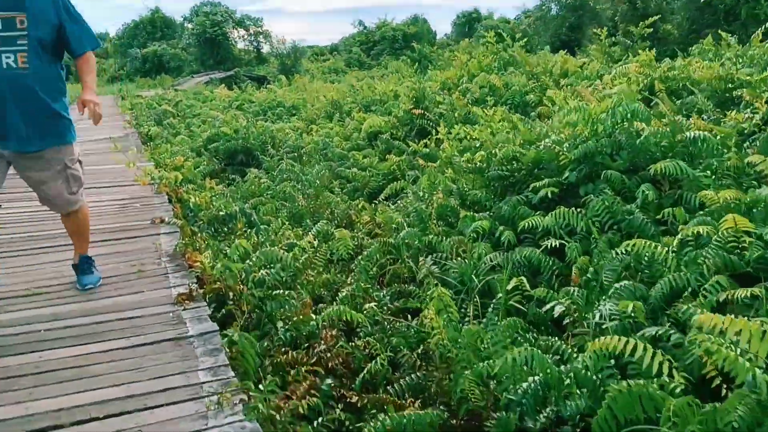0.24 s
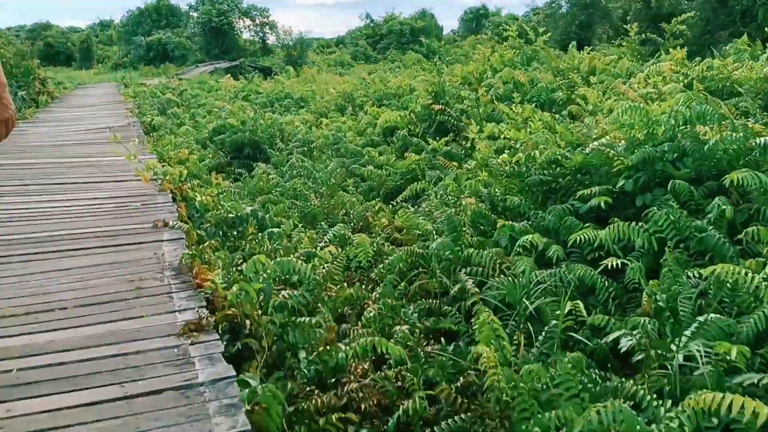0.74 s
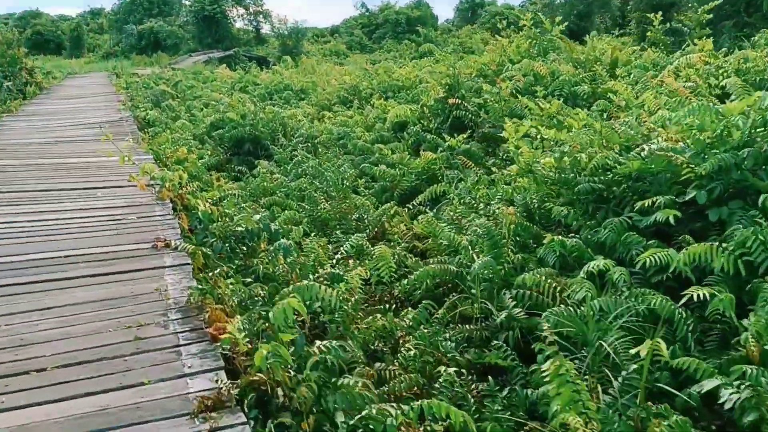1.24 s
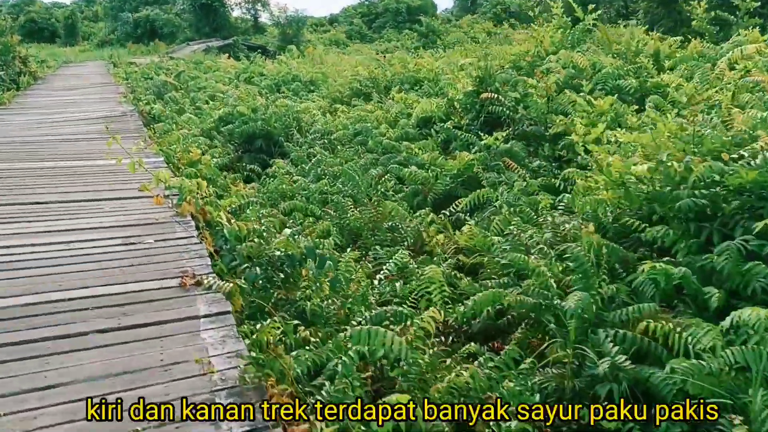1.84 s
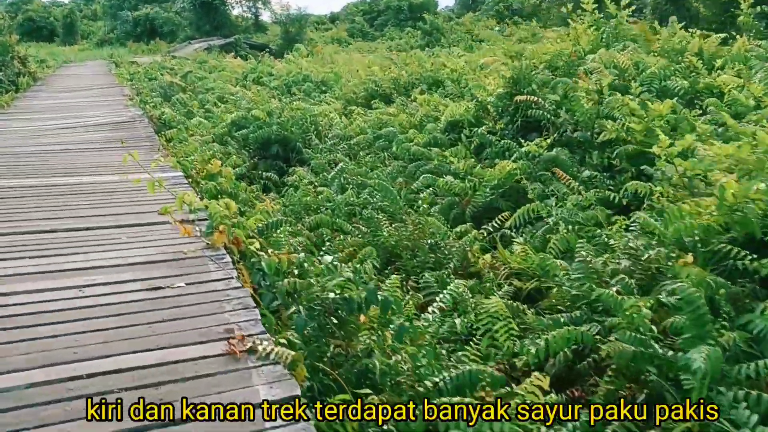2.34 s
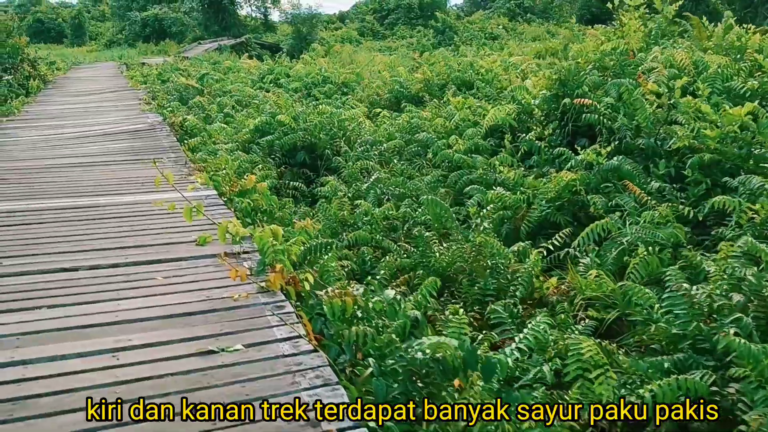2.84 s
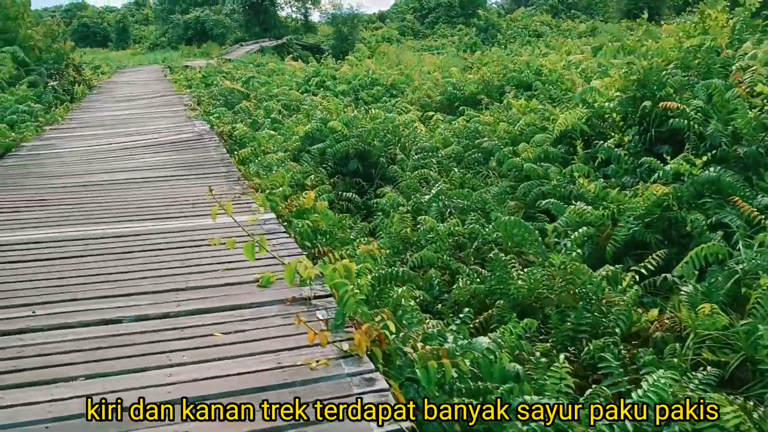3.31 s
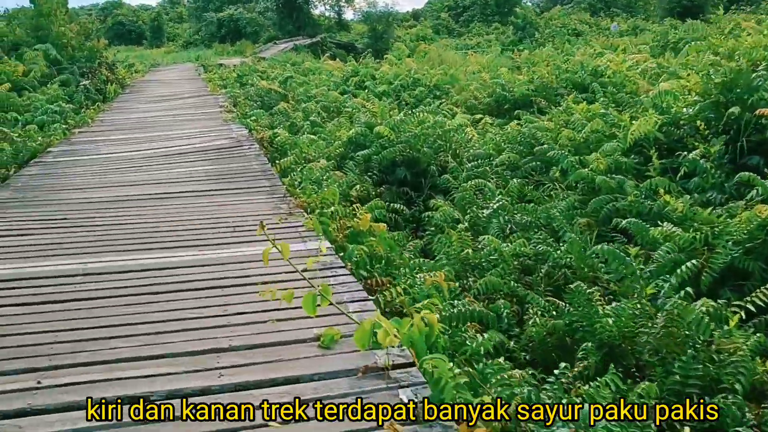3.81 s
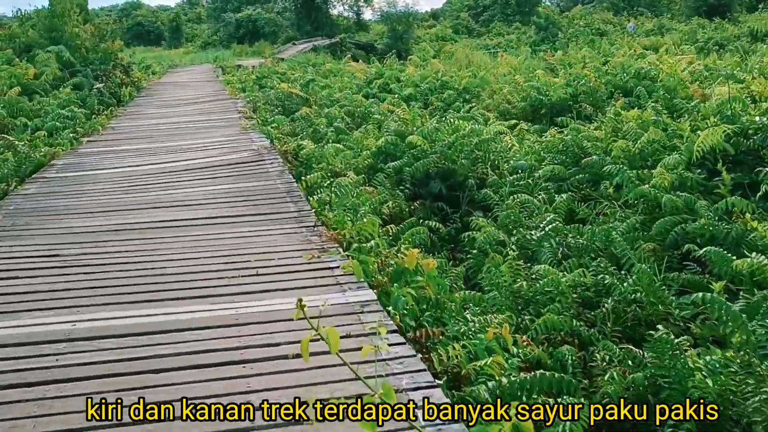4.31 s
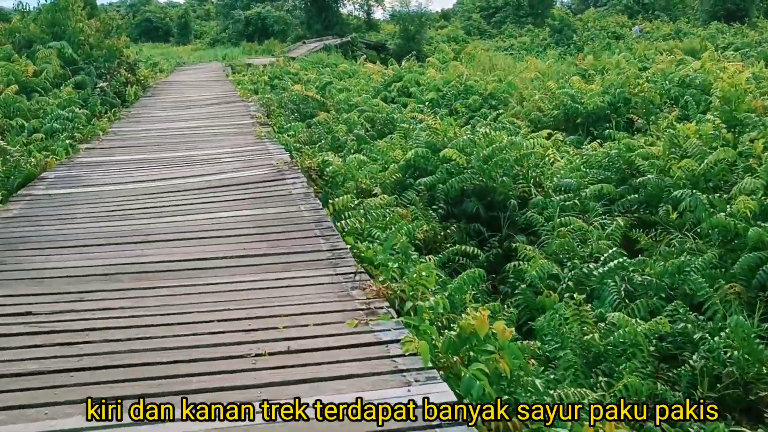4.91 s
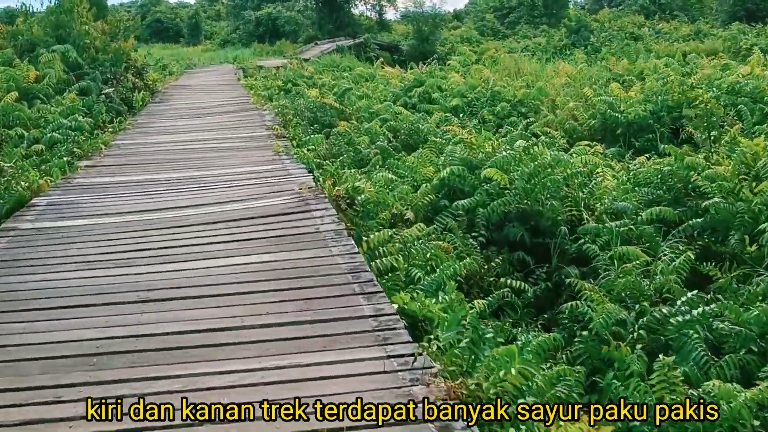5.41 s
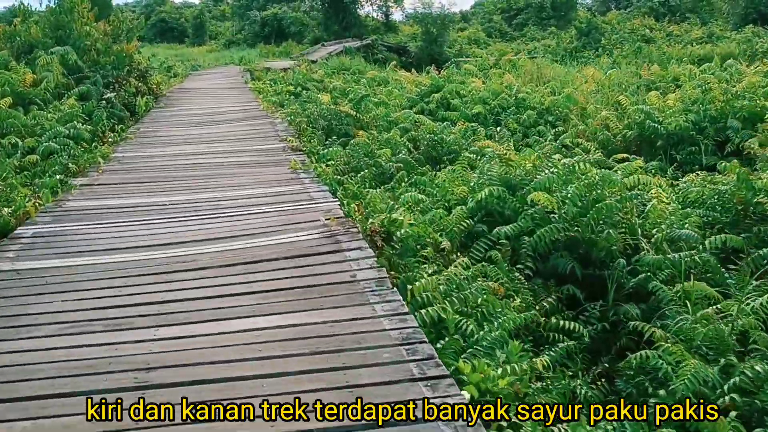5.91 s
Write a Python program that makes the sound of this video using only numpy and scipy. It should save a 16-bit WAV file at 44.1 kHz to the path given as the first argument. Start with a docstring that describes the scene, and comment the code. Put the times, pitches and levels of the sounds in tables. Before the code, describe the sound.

Close, brisk footsteps in rubber soles on a boardwalk of loose planks: hollow woody knocks about every half second, each with small clatters, board creaks and gritty scuffs. The first half second is quiet, then the steps grow firm. Faint insects hiss behind, one soft bird whistle falls near one second, and a very high thin whine wavers on the right. Open, dry outdoor place; stereo microphone near the deck, with slight low rumble.

```python
"""Brisk footsteps on a boardwalk of loose planks, with insects, one bird whistle and a thin, high whine on the right.
Each blow is a burst of bounces ringing plank resonances, plus the struck plank's own decaying note.
Beams thump as damped sines; short bright bursts, creaks and brushes are noise through resonances;
rubbing soles, stirring boards and a low rumble are fluttering noise bands. Insects are narrow noise,
steady or pulsed; bird and whine are wavering sines."""
import sys
import numpy as np
from scipy import signal
from scipy.io import wavfile

SR = 44100
rng = np.random.default_rng(int(sys.argv[2]) if len(sys.argv) > 2 else 0)


def waveform_to_disk(signal):
    """Save audio, clipped to [-1, 1], as 16-bit WAV at the path in sys.argv[1]."""
    frames = np.transpose(np.atleast_2d(signal))
    scaled = np.clip(frames, -1, 1) * 32767
    samples = np.round(scaled).astype(np.int16)
    wavfile.write(sys.argv[1], SR, samples)


N = 271523
TIME_S = np.arange(N) / SR

# Heels, toes and loose boards striking the deck. Each row: start in seconds, relative level in dB,
# hardness as tilt in dB per octave, relative clatter decay in seconds, lead of the left channel in ms,
# the plank's own note in Hz.
KNOCKS = [(0.021, -39.5, -4, 0.057, -0.21, 331), (.44, -37.5, 2, 0.046, 0.24, 325),
          (.484, -33, -3, 0.069, 0.28, 192.4), (.516, -33, -0.5, 0.021, 0.29, 305),
          (.562, -32, 3, 0.22, 0.33, 436), (.691, -27, 1, 0.21, 0.26, 481),
          (.956, -29, 1.5, 0.56, 0.31, 438), (0.9961, -20, 2, 0.091, -0.086, 277.2),
          (1.015, -19, -0.5, 0.08, 0.096, 482), (1.422, -32, -2.5, 0.028, .2, 316),
          (1.48, -17, 2.5, 0.25, 0.26, 318.4), (1.538, -32, 2.5, 0.11, 0.27, 313),
          (1.568, -26, -1, 0.2, 0.17, 291), (1.65, -29.5, -1, .07, 0.33, 320),
          (1.681, -33, -1.5, 0.11, 0.22, 615), (1.762, -31.5, 1.5, 0.23, -0.22, 503),
          (2.0562, -14.5, 1, 0.088, -0.035, 307), (2.1116, -21, 1, 0.091, 0.11, 212),
          (2.485, -45, -5, 0.065, 0.26, 475), (2.6, -21.5, 0, 0.047, 0.12, 277.2),
          (2.799, -33, -3, 0.31, -0.32, 407), (2.978, -37.5, 0.5, 0.72, 0.15, 794),
          (3.103, -22.5, -1.5, 0.11, 0.034, 345.5), (3.1479, -23, 2, 0.052, -0.11, 600),
          (3.156, -18, 4.5, 0.12, 0.11, 314), (3.216, -34, 1.5, 0.034, 0.18, 715),
          (3.33, -39.5, -1.5, 0.18, 0.097, 372), (3.498, -33.5, -2, 0.13, 0.15, 417),
          (3.626, -36, -6.5, 0.02, 0.24, 350), (3.714, -25, 3.5, 0.18, -0.23, 460),
          (4.1245, -21, -2, 0.38, 0.34, 281.6), (4.162, -15.5, 2.5, 0.15, 0.24, 569),
          (4.2, -25.5, 2.5, 0.22, 0.22, 235), (4.356, -42.5, 1, 0.18, -0.065, 754),
          (4.422, -47, 3, 0.13, 0.11, 1250), (4.894, -32.5, 1, 0.22, -0.12, 394),
          (4.931, -30, 1.5, 0.33, -0.21, 533), (4.98, -37.5, -1, 0.11, -0.34, 350),
          (5.2288, -21.5, -3.5, 0.045, 0.33, 635), (5.237, -20, -5, 0.091, 0.14, 560),
          (5.293, -29, -5, 0.22, -0.059, 223), (5.303, -31, 4, 0.34, 0.28, 320),
          (5.46, -41.5, 5, 0.13, 0.14, 390), (5.634, -37.5, -5, 0.24, 0.23, 342),
          (5.7177, -19, 0.6, 0.079, 0.25, 279.5), (5.788, -37, -2, 0.096, 0.32, 280),
          (5.933, -33.5, 4, 0.12, -0.098, 696), (5.942, -26, 3, 0.27, -0.028, 424)]
# Thud, knock, clack and crack of the wood. Each row: low edge in Hz, high edge in Hz.
REGISTERS_HZ = [(70, 250), (250, 700), (700, 1800), (1800, 4500)]
# Weight of thud, knock, clack and crack in an untilted blow, in dB.
REGISTER_DB = (-12.5, -2, -2.5, -11)
# Plank resonances. Each row: nominal frequency in Hz, width in Hz, relative gain in dB.
PLANK = [(155.2, 49, 2), (224, 67, 5.5), (303, 99, 4.5), (428.4, 146, 2.5), (577.4, 41, 0), (780, 57, -2),
         (1007, 160, -7.5), (1340, 140, -7), (1664, 83, -3.5), (2024, 180, 1), (2329, 140, 2.5),
         (2736, 43, 1.5)]
# Beams giving under the walker's weight. Each row: start in seconds, relative level in dB.
THUMPS = [(0.989, -43), (2.733, -40), (2.782, -41), (4.163, -28)]
# Short bright bursts: grit and twigs snapping, and two faint high chirps near 10 kHz.
# Each row: start in seconds, relative level in dB, pitch in Hz.
BRIGHT_BURSTS = [(0.447, -50, 3320), (0.955, -47, 4600), (1.293, -50.5, 10160), (1.422, -49.5, 9960),
                 (1.438, -34.5, 3290), (2.595, -42, 5250), (2.942, -49, 5000), (3.565, -45.5, 5100),
                 (3.715, -47.5, 4950), (5.261, -46.5, 5260), (5.268, -42, 11000), (5.734, -37, 4650),
                 (5.734, -41, 8700), (6.008, -36.5, 4400)]
# Boards creaking, groaning or clacking, some at the moment of a blow.
# Each row: start in seconds, level in dB, pitch in Hz, width in Hz.
CREAKS = [(1.462, -54, 3030, 208), (2.348, -61.5, 2430, 378), (2.482, -52.5, 1305, 55.8),
          (3.699, -44.5, 3000, 800), (4.66, -58, 2800, 110), (4.758, -51.5, 1050, 300),
          (5.228, -25.5, 667, 135), (5.41, -50.5, 1350, 59), (5.633, -43, 884, 110),
          (5.721, -32.5, 2770, 173)]
# Light soles brushing a board. Each row: start in seconds, length in seconds, relative level in dB,
# start resonance in Hz, end resonance in Hz.
BRUSHES = [(0.074, 0.054, -47.5, 615, 524), (0.158, 0.067, -48.5, 611, 737),
           (0.251, 0.066, -50.5, 848, 717), (3.471, 0.04, -36.5, 896, 424), (4.492, .1, -49, 705, 508),
           (4.682, 0.12, -37, 197, 346)]
# Soles rolling over the boards. Each row: time of full weight in seconds, hold in seconds,
# stirring boards in dB, rubbing sole in dB.
ROLLS = [(0.0, 0.031, -35.5, -49), (0.478, 0.12, -37.5, -46.5), (1.004, 0.27, -47, -52.5),
         (1.441, 0.0062, -39, -36.5), (1.53, 0.27, -41.5, -50), (2.012, 0.06, -52.5, -54.5),
         (2.288, 0.017, -75, -62.5), (2.615, 0.028, -32, -63), (3.701, 0.044, -37, -51),
         (4.029, 0.011, -42, -91), (4.933, 0.045, -33.5, -50), (5.066, 0.02, -52, -53.5),
         (5.252, .008, -34, -39.5), (5.456, .03, -40, -56), (5.684, 0.13, -50, -55),
         (5.966, 0.0062, -35.5, -34.5)]
# Spectrum of the stirring boards. Each row: frequency in Hz, relative density in dB per Hz.
BOARDS_SPECTRUM = [(120, -10.5), (280, 2.5), (600, -5.5), (1000, -0.5), (2200, -14), (3500, -16.5),
                   (6000, -39.5)]
# Spectrum of the rubbing soles and the air. Each row: frequency in Hz, relative density in dB per Hz.
SCUFF_SPECTRUM = [(1200, 0), (3200, -5), (5500, -9), (7000, -18), (11000, -41)]
# Spectrum of the low rumble. Each row: frequency in Hz, relative density in dB per Hz.
RUMBLE_SPECTRUM = [(25, -32), (50, 2), (85, 13.5), (150, -0.5), (250, -5.5), (500, -67)]
# Course of the low rumble. Each row: time in seconds, relative level in dB.
RUMBLE_LEVEL = [(0.0, -52.5), (0.35, -84.5), (0.52, -60.5), (1.3, -57), (1.86, -48.5), (1.98, -70),
                (2.45, -57.5), (2.81, -39.5), (3.0, -66.5), (3.4, -70.5), (3.6, -42.5), (3.9, -69),
                (4.2, -54), (4.32, -77), (5.25, -64.5), (5.57, -88)]
# Bird whistle. Each row: time in seconds, mean pitch in Hz, amplitude in dB.
BIRD = [(1.01, 3280, -66), (1.04, 3250, -52), (1.12, 3200, -51), (1.18, 3060, -56), (1.28, 3020, -74)]
# The two whine tones, in Hz.
WHINE_HZ = (15031, 15087)
# Each whine tone against the common course, in dB.
WHINE_LINE_DB = (0, 8.5)
# Common course of the whine tones. Each row: time in seconds, relative level in dB.
WHINE_LEVEL = [(0.0, -48), (0.38, -70), (0.5, -40.5), (0.84, -68.5), (1.01, -45.5), (1.6, -50), (2.4, -41),
               (2.88, -58), (3.15, -44), (3.55, -59), (3.64, -35), (3.94, -54.5), (4.06, -41),
               (4.53, -51.5), (4.61, -38.5), (5.5, -59), (5.74, -32), (6.16, -59)]
# Likeness of the two channels. Each row: frequency in Hz, correlation (no unit).
LIKENESS = [(40, .1), (120, .95), (300, .96), (600, .8), (1200, .45), (2500, .25)]

TILT_PIVOT_HZ = 600
SOFT_DB, HARD_DB = -41, -31  # strongest register of a fully soft and a fully hard blow
LEAD_MAX_MS = 0.4
ROLL_ATTACK_S, ROLL_RELEASE_T60_S = 0.051, 0.26
GRIT_DB, GRIT_HZ = 4.5, 70  # spread and rate of the uneven scrapes
RUMBLE_GAIN_DB, RUMBLE_PAN_DB, RUMBLE_SWING_DB = 6, 4, 1.5
BOARDS_REST_DB, AIR_DB, REST_SWING_DB = -61.5, -68.5, 2  # between the steps
CUTOFF_HZ = 16800


def from_db(db):
    """Decibels to amplitude."""
    return 10 ** (np.asarray(db) / 20)


def rms_one(x):
    """Scale to an rms of 1."""
    return x / np.sqrt(np.mean(x ** 2) + 1e-20)


def in_time(rows):
    """Each column of a curve at every sample."""
    s, *columns = np.transpose(rows)
    return [np.interp(TIME_S, s, c) for c in columns]


def at_hz(points, hz):
    """Read a curve on a log-frequency axis."""
    curve_hz, values = np.transpose(points)
    return np.interp(np.log(hz), np.log(curve_hz), values)


def band(x, low_hz, high_hz, order=2):
    """Butterworth band-pass."""
    sos = signal.butter(order, [low_hz, high_hz], "band", fs=SR, output="sos")
    return signal.sosfilt(sos, x + 1e-18)


def resonate(x, hz, width_hz):
    """Two-pole resonance with about unit gain at its peak."""
    r = np.exp(-np.pi * width_hz / SR)
    zeros = np.array([1, 0, -1]) * (1 - r * r) / 2
    poles = [1, -2 * r * np.cos(2 * np.pi * hz / SR), r * r]
    return signal.lfilter(zeros, poles, x + 1e-18)


def drift(rate_hz):
    """Slow chance of rms 1: noise at SR / 40 through two equal low-pass poles."""
    r = np.exp(-80 * np.pi * rate_hz / SR)
    noise = rng.standard_normal(N // 40 + 2002)
    slow = signal.lfilter([1], [1, -2 * r, r * r], noise)[2000:]  # skip the settling
    return np.interp(np.arange(N) / 40, np.arange(len(slow)), rms_one(slow))


def spread(mid, side, hz):
    """Mix two signals so that the channels are as alike as LIKENESS says at hz."""
    alike = np.clip(at_hz(LIKENESS, hz), -1, 1)
    sign = np.array([[1], [-1]])
    return (np.sqrt(1 + alike) * mid + np.sqrt(1 - alike) * side * sign) / np.sqrt(2)


def from_side(sound, lead_ms):
    """Sound from one side reaches the nearer channel first."""
    i = np.arange(sound.shape[-1])
    half = np.round(np.clip(lead_ms, -LEAD_MAX_MS, LEAD_MAX_MS) * SR / 1000) / 2
    shifts = (half - abs(half), -half - abs(half))
    return np.array([np.interp(i + shift, i, channel, left=0) for channel, shift in zip(sound, shifts)])


def add(out, s, sound):
    """Mix a short sound in at a time."""
    i = max(int(s * SR), 0)
    out[:, i:i + sound.shape[-1]] += sound[..., :N - i]


def grainy_noise(spectrum, grain_db, grain_hz=33):
    """Stereo noise in nine equal-ratio bands, neighbours fluttering separately; rms 1."""
    edges_hz = np.geomspace(spectrum[0][0], spectrum[-1][0], 10)
    white = [rng.standard_normal((2, N)) * from_db(grain_db * drift(grain_hz)) for _ in range(2)]
    out = 0
    for k, (low_hz, high_hz) in enumerate(zip(edges_hz, edges_hz[1:])):
        hz = np.sqrt(low_hz * high_hz)
        part = spread(*band(white[k % 2], low_hz, high_hz), hz)
        out = out + from_db(at_hz(spectrum, hz)) * part
    return rms_one(out)


def blow_force(t, softness, t60_s, bounces_per_s=1300, deck_db=-31, deck_t60_s=0.3, deck_hz=1500, roll_s=0.0097):
    """First contact, ever weaker bounces and a faint, dull answer from the rest of the deck."""
    bounces = (rng.random((2, len(t))) < bounces_per_s / SR) * rng.standard_normal((2, len(t)))
    # a hard heel strikes at once; a light foot rolls on to the board
    onset = 1 - np.exp(-t / (1 / SR + roll_s * softness))
    force = bounces * from_db(-60 * t / (t60_s * 0.93)) * onset
    deck = band(rng.standard_normal((2, len(t))), REGISTERS_HZ[0][0], deck_hz, order=1)
    force += from_db(deck_db) * deck * from_db(-60 * t / deck_t60_s)
    # mid part of the first contact fixed, side part random
    force[:, 0] += 1.6 * (1 - softness) * np.array([1, rng.uniform(-1, 1)])
    return force


def knock(levels_db, t60_s, loss_db_per_cycle=0.11):
    """The blow rings the plank resonances; the wood loses its treble first."""
    t = np.arange(SR // 3) / SR
    softness = np.interp(max(levels_db), [SOFT_DB, HARD_DB], [1, 0])
    force = blow_force(t, softness, t60_s)
    # plank size varies, and each blow favours other resonances
    size = np.exp(0.04 * rng.standard_normal())
    wood = 0.11 * force
    for hz, width_hz, db in PLANK:
        gain = from_db(db + rng.normal(0, 3))
        wood = wood + gain * resonate(force, hz * size * np.exp(rng.normal(0, 0.012)), width_hz)
    # each register is levelled by its first 25 ms
    out, attack = 0, t < 0.025
    for (low_hz, high_hz), db in zip(REGISTERS_HZ, levels_db):
        hz = np.sqrt(low_hz * high_hz)
        part = spread(*band(wood, low_hz, high_hz, order=3), hz) * from_db(-loss_db_per_cycle * hz * t)
        out = out + from_db(db) * part / np.sqrt(np.mean(part[:, attack] ** 2))
    return out


def plank_note(hz, ring_cycles=36, rise_s=0.00068, overtone=2.84, overtone_db=-6):
    """The struck plank bends and rings on its own note; one unharmonic overtone dies sooner."""
    t = np.arange(SR // 3) / SR
    upper_hz = hz * overtone * np.exp(rng.normal(0, 0.02))
    note = np.sin(2 * np.pi * hz * t) * from_db(-60 * t * hz / ring_cycles)
    upper_db = overtone_db - 60 * t * upper_hz / (2 * ring_cycles)
    upper = np.sin(2 * np.pi * upper_hz * t) * from_db(upper_db)
    return (note + upper) * (1 - np.exp(-t / rise_s))


def footsteps(sole_hz=3650, gain_db=2.0, note_db=2):
    """Blows on the planks, dulled by the rubber sole; hardness tips the weight from thud to crack."""
    out = np.zeros((2, N))
    octaves = np.log2(np.sqrt(np.prod(REGISTERS_HZ, axis=1)) / TILT_PIVOT_HZ)
    for s, db, tilt, t60_s, lead_ms, note_hz in KNOCKS:
        clatter = knock(db + np.array(REGISTER_DB) + tilt * octaves, max(t60_s, 0.02))
        note_level_db = db + note_db + tilt * np.log2(note_hz / TILT_PIVOT_HZ)
        note = from_db(note_level_db) * plank_note(note_hz)
        add(out, s, from_side(clatter + note, lead_ms))
    sole = signal.butter(4, sole_hz, fs=SR, output="sos")
    return from_db(gain_db) * signal.sosfilt(sole, out)


def thumps(beam_hz=100, rise_s=0.0086, t60_s=0.074):
    """A beam swings a few times, deep and dull, near beam_hz."""
    out, t = np.zeros((2, N)), np.arange(SR // 3) / SR
    for s, db in THUMPS:
        hz = beam_hz * np.exp(rng.normal(0, 0.08))
        swing = np.sin(2 * np.pi * hz * t) * (1 - np.exp(-t / rise_s)) * from_db(-60 * t / t60_s)
        add(out, s, from_db(db) * 2 * swing / np.abs(swing).max())
    return out


def bright_bursts(width_hz=350, crunch=0.17, t60_s=0.035, gain_db=-3.0):
    """Snapping grit and twigs and two faint high chirps: short noise, each with one bright resonance."""
    out, t = np.zeros((2, N)), np.arange(SR // 10) / SR
    for s, db, hz in BRIGHT_BURSTS:
        noise = rng.standard_normal((2, len(t))) * from_db(-60 * t / t60_s)
        burst = band(noise, hz / 2, min(2 * hz, 12000), order=3)
        add(out, s, from_db(db + gain_db) * rms_one(resonate(burst, hz, width_hz) + crunch * burst))
    return out


def creaks(slips_per_s=900, rise_s=0.0017, t60_s=0.08):
    """Boards creak, groan or clack: a run of tiny slips swells and dies in one resonance."""
    out, t = np.zeros((2, N)), np.arange(SR // 5) / SR
    for s, db, hz, width_hz in CREAKS:
        slips = (rng.random((2, len(t))) < slips_per_s / SR) * rng.standard_normal((2, len(t)))
        rub = band(slips, hz / 2, hz * 2) * (1 - np.exp(-t / rise_s)) * from_db(-60 * t / t60_s)
        add(out, s, from_db(db) * rms_one(spread(*resonate(rub, hz, width_hz), hz)))
    return out


def brushes(sharpness=5.2, rub_db=-7, rub_reach=2.73):
    """Soft friction swells and fades in one resonance gliding as the foot moves on, amid a dull rustle."""
    out, t = np.zeros((2, N)), np.arange(SR // 2) / SR
    for s, length_s, db, start_hz, end_hz in BRUSHES:
        low_hz, high_hz = start_hz / 2, start_hz * rub_reach
        friction = rng.standard_normal((2, len(t)))
        # playing the ringing noise at a changing speed glides its pitch
        glide_s = np.cumsum(np.interp(t, [0, length_s], [1, end_hz / start_hz])) / SR
        ringing = resonate(friction, start_hz, start_hz / sharpness)
        board = np.array([np.interp(glide_s, t, channel) for channel in ringing])
        rustle = rms_one(band(friction, low_hz, high_hz))
        rub = band(rms_one(board) + from_db(rub_db) * rustle, low_hz, high_hz)
        swell = np.sqrt(np.sin(np.pi * np.minimum(t / length_s, 1)).clip(0))
        add(out, s, from_db(db) * swell * spread(*rub, start_hz))
    return out


def roll(s, hold_s):
    """Weight comes on to the sole, stays, and dies away."""
    attack = np.clip((TIME_S - s) / ROLL_ATTACK_S + 1, 0, 1)
    return attack * from_db(-60 * np.maximum(TIME_S - s - hold_s, 0) / ROLL_RELEASE_T60_S)


def shuffle(unrest):
    """Rolling weight stirs loose boards, which ring, and rubs soles, which catch on grit."""
    stir, rub = from_db(BOARDS_REST_DB) * unrest, 0
    for s, hold_s, boards_db, scuff_db in ROLLS:
        weight = roll(s, hold_s)
        stir = stir + from_db(boards_db) * weight
        rub = rub + from_db(scuff_db) * weight
    noise = grainy_noise(BOARDS_SPECTRUM, grain_db=6.5)
    ringing = sum(from_db(db) * resonate(noise, hz, width_hz) for hz, width_hz, db in PLANK)
    return stir * rms_one(ringing) + rub * grainy_noise(SCUFF_SPECTRUM, GRIT_DB, GRIT_HZ)


def low_rumble():
    """Low rumbling noise like wind or handling on a microphone, stronger on the right."""
    level_db, = in_time(RUMBLE_LEVEL)
    pan = from_db([[-RUMBLE_PAN_DB], [RUMBLE_PAN_DB]])
    return from_db(level_db + RUMBLE_GAIN_DB) * grainy_noise(RUMBLE_SPECTRUM, RUMBLE_SWING_DB) * pan


def whine(hiss_db=-52, waver_db=5.5, waver_hz=9, left_db=-18):
    """Two close, very high tones swell together, waver separately and beat in a narrow hiss."""
    level_db, = in_time(WHINE_LEVEL)
    tones = 0
    for hz, line_db in zip(WHINE_HZ, WHINE_LINE_DB):
        amplitude = from_db(level_db + line_db + waver_db * drift(waver_hz))
        tones = tones + amplitude * np.sin(2 * np.pi * hz * TIME_S + 0.55 * drift(4.1))
    hiss = rms_one(band(rng.standard_normal(N), 14970, 15200, order=3))
    return (np.sqrt(2) * tones + from_db(hiss_db) * hiss) * from_db([[left_db], [0]])


def bird(waver_hz=16):
    """One falling, slightly unsteady whistle: a sine of drifting pitch."""
    hz, db = in_time(BIRD)
    singing = (TIME_S > BIRD[0][0]) & (TIME_S < BIRD[-1][0])
    cycles = np.cumsum(hz + waver_hz * drift(24)) / SR
    return singing * from_db(db) * np.sin(2 * np.pi * cycles)


def insects(chorus_db=-61, chirp_gain_db=-64, chirp_hz=5620, buzz_gain_db=-68):
    """Narrow noise: a far chorus hisses steadily, one insect buzzes in pulses, another chirps."""
    chorus = rms_one(band(rng.standard_normal((2, N)), 7240, 8440, order=3))
    pulses = 1 + np.sin(2 * np.pi * 11 * TIME_S + drift(2))  # about 11 per second
    buzz = rms_one(band(rng.standard_normal((2, N)), 8150, 8260)) * pulses
    strokes = np.clip(np.sin(2 * np.pi * 6 * TIME_S + 2 * drift(2)), 0, 1) ** 2  # about 6 per second
    strokes = strokes * np.clip(1 + drift(2), 0, 1)
    chirp = rms_one(resonate(rng.standard_normal((2, N)), chirp_hz, 60)) * strokes
    return from_db(chorus_db) * chorus + from_db(buzz_gain_db) * buzz + from_db(chirp_gain_db) * chirp


def outdoor_air(unrest):
    """Faint, smooth noise, swelling slightly."""
    return from_db(AIR_DB) * unrest * grainy_noise(SCUFF_SPECTRUM, 0)


def scene():
    """The walk in the open meadow; resting boards and air share one slow unrest."""
    unrest = from_db(REST_SWING_DB * drift(4.8))
    walk = footsteps() + thumps() + bright_bursts() + creaks() + brushes() + shuffle(unrest)
    return walk + low_rumble() + whine() + bird() + insects() + outdoor_air(unrest)


def record(dry):
    """Clip at full scale, then cut steeply above CUTOFF_HZ."""
    low_pass = signal.ellip(10, 0.1, 80, CUTOFF_HZ, fs=SR, output="sos")
    return signal.sosfilt(low_pass, np.clip(dry, -1, 1))


dry = scene()
out = record(dry)
waveform_to_disk(out)
```